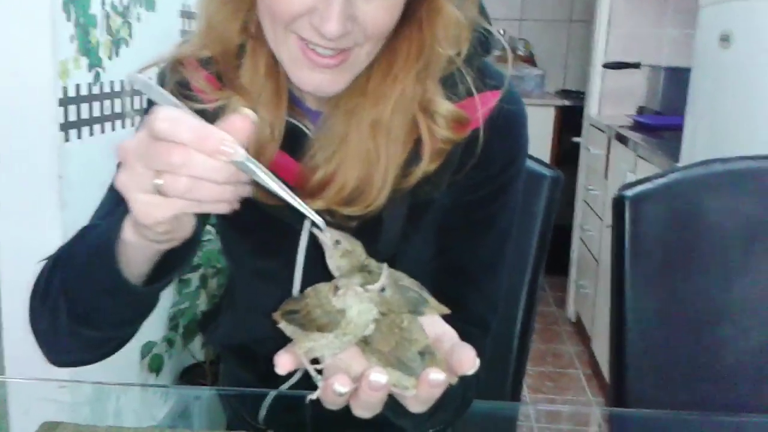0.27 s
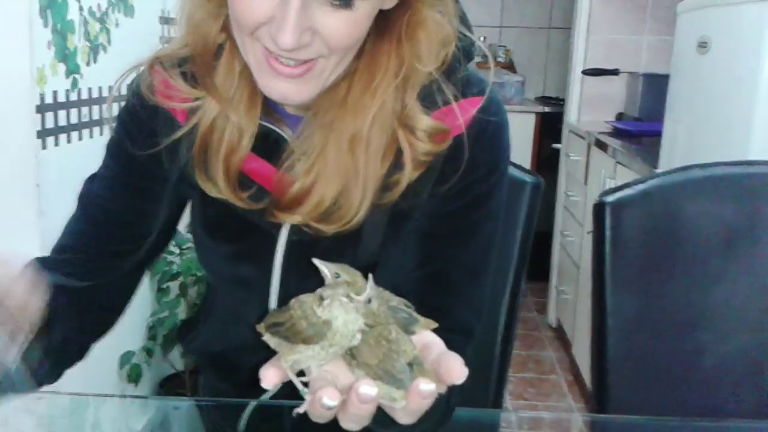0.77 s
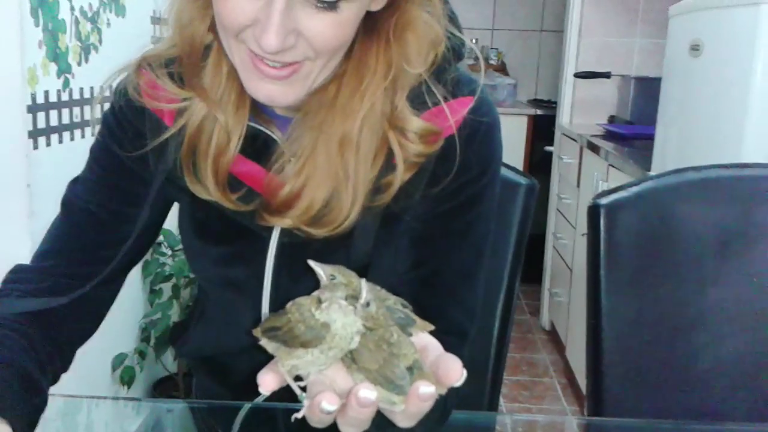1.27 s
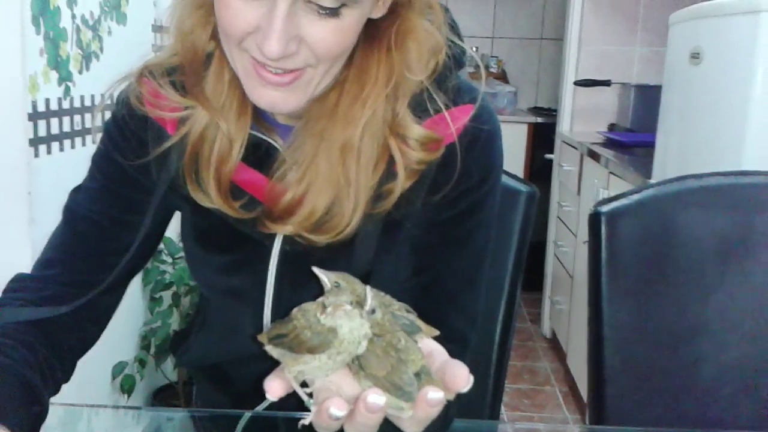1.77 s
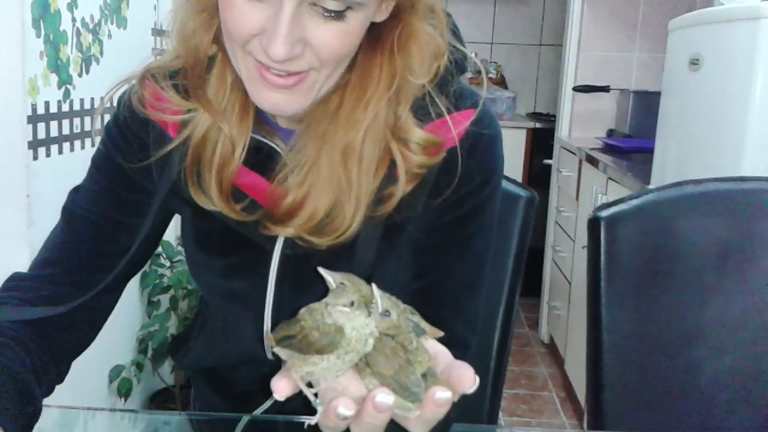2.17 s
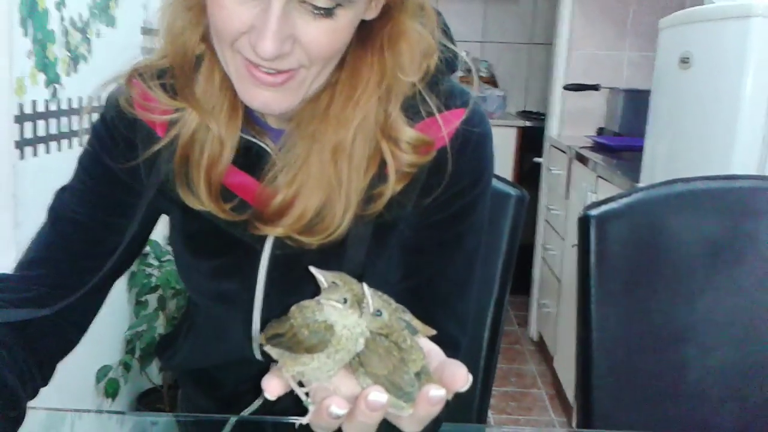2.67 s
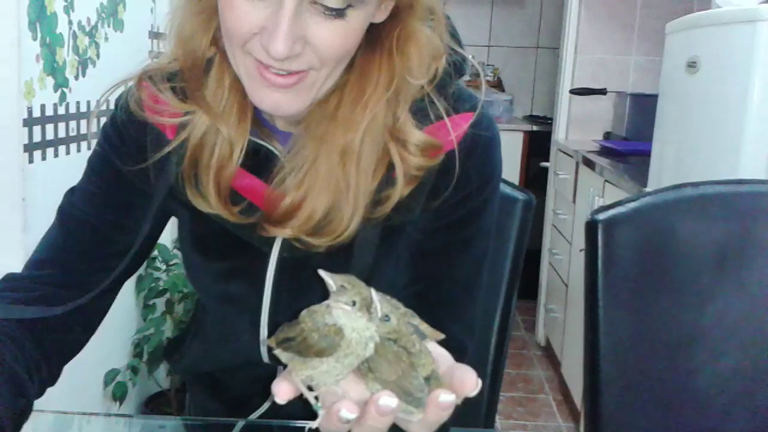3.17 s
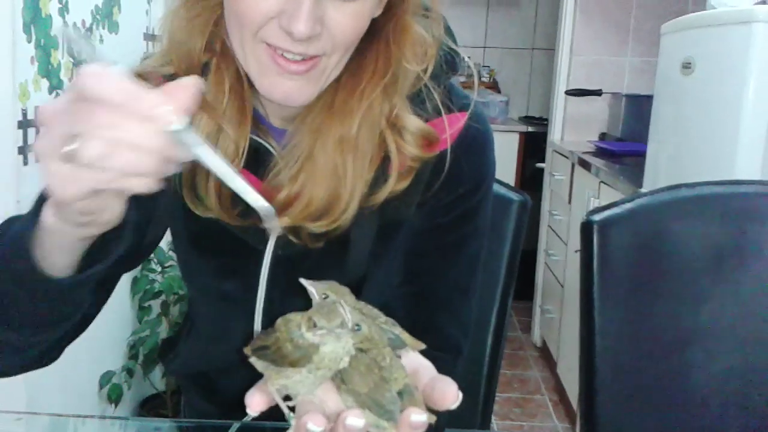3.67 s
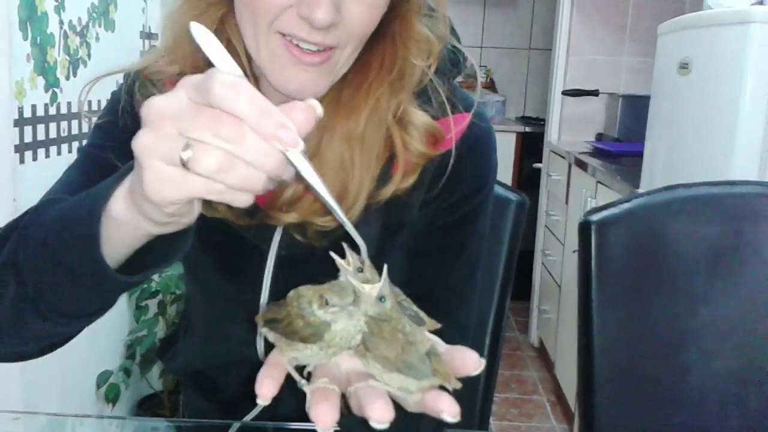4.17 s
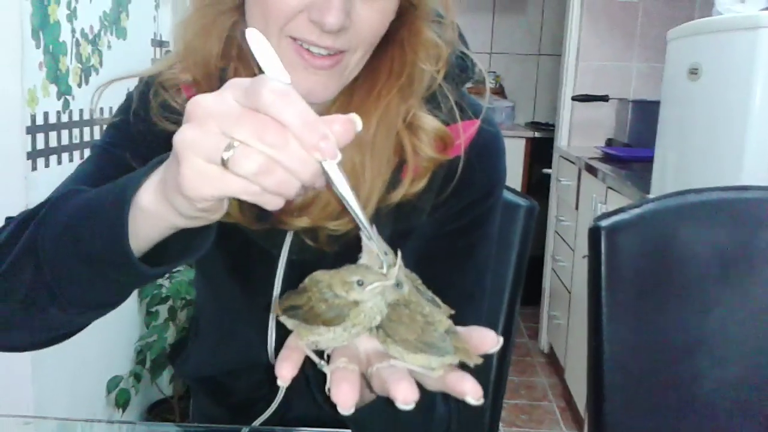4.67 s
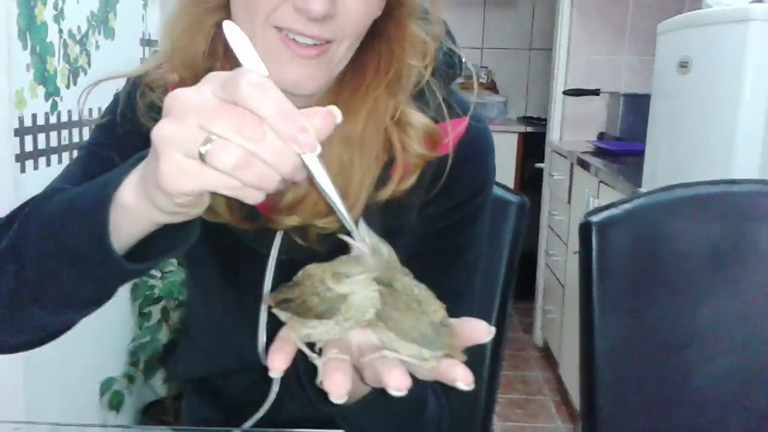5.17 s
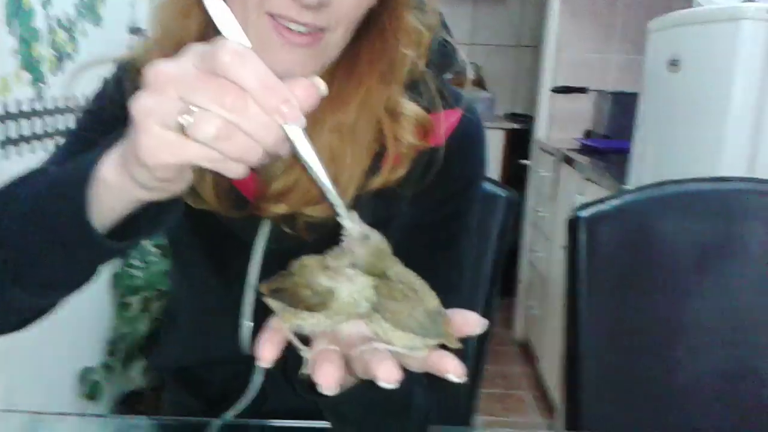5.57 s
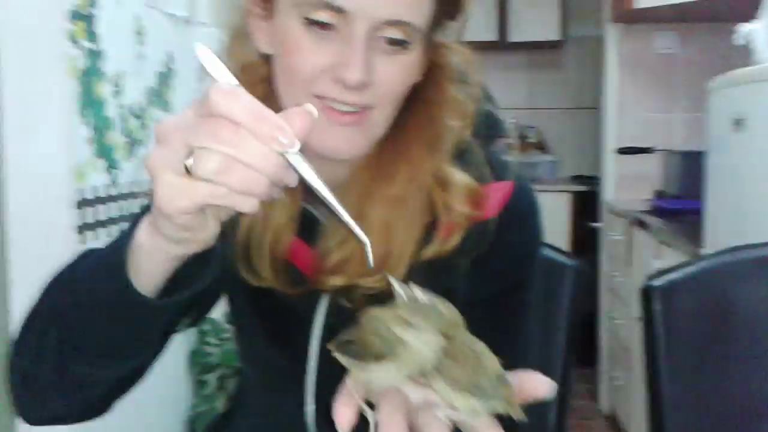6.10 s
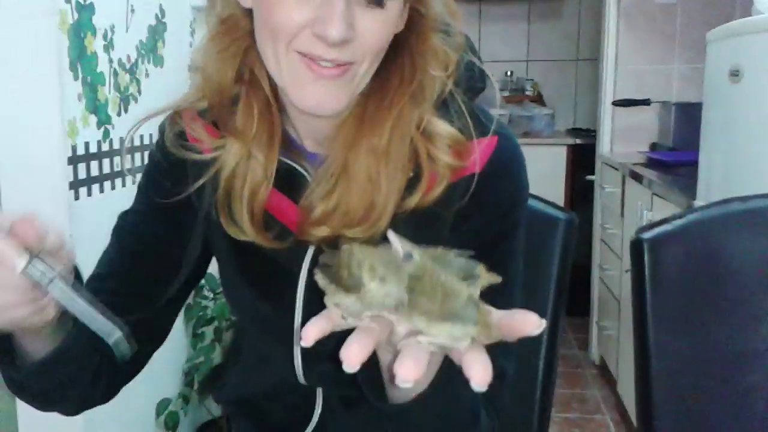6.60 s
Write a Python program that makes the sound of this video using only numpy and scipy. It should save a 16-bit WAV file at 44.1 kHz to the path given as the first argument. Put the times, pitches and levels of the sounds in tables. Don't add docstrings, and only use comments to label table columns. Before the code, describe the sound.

From the start, already under way, a big nestling begs loudly: about seven harsh, buzzy chirps per second, each a steep fall in pitch with a lower chirrup after it, until 0.9 s. A smaller, thinner bird joins at 0.6 s. A sleeve brushes faintly around 0.4 s. Light ticks on a dish come at 1.1 and 1.3 s, a tiny peep at 1.5 s. The small bird gives short bursts at 1.85-2.1 and 2.85-3.1 s; a clearer dish tick follows at 3.3 s. The big one swells from 3.7 s into another strong trill until 4.95 s, with small knocks beneath. Soft peeps at 5.2 s, three small-bird chirps at 5.4-5.7 s with a dull knock, then faint single chirps at 6.1, 6.6 and 6.8 s. Tiled-room reflections trail the calls; suppressed air and fridge hum rise only with them, leaving thin hiss.

```python
import sys
import numpy as np
from scipy import signal
from scipy.fft import rfft, irfft
from scipy.io import wavfile
from scipy.ndimage import uniform_filter1d

SR = 44100
rng = np.random.default_rng(int(sys.argv[2]) if len(sys.argv) > 2 else 0)


def unload_audio(sound):
    columns = np.transpose(np.atleast_2d(sound))
    steps = np.round(np.clip(columns, -1, 1) * 32767)
    wavfile.write(sys.argv[1], SR, steps.astype(np.int16))


def ratio(d):
    e = np.asarray(d, float) / 20
    return 10 ** e


N = 301644
LEAD = 4410


def colour(x, table):
    hz, db = np.transpose(table)
    f = np.maximum(np.arange(len(x) // 2 + 1) * SR / len(x), 1)
    return irfft(rfft(x) * ratio(np.interp(np.log(f), np.log(hz), db)), len(x))


def unit(x):
    return x / np.sqrt(np.mean(x ** 2))


def add(out, x, s):
    i = LEAD + int(s * SR)
    out[i:i + len(x)] += x[:len(out) - i]


def wobble(size, ms):
    k = max(int(ms * SR / 1000), 1)
    return unit(uniform_filter1d(uniform_filter1d(rng.standard_normal(size), k), k))


def bend(ms):
    return np.sqrt(ms ** 2 + 6) - np.sqrt(6)


def bell(x):
    return np.exp(-.5 * x ** 2)


# multiple of the pitch, level in dB.
PARTIALS = [(1, -25.5), (4, -16.5), (5, -28), (6, -27)]
# frequency in Hz, level in dB.
RASP = [(1500, -35.5), (2600, -22), (4000, 2), (8000, -3.5), (10500, -15), (12500, -21), (15000, -19)]


def puff(top_hz, fall, loud_ms, second_db, beak):
    ms = np.arange(-16, 26, 1000 / SR)
    late = ms - loud_ms
    opener = top_hz > 3350
    slope = np.where(ms < 0, 75 if opener else 0.82 * fall, fall)
    knee = np.minimum(ms, max(loud_ms - .9, 0))
    hz = top_hz - slope * bend(knee) - min(fall, 160) * (bend(ms) - bend(knee))
    hz = np.maximum(hz - 20.5 * np.maximum(late, 0) ** 2, 1000)
    phase = 2 * np.pi * np.cumsum(hz * (1 + 0.016 * wobble(len(ms), ms=0.52))) / SR
    flutter = ratio(2.86 * wobble(len(ms), ms=0.86)) * signal.windows.tukey(len(ms), .2)
    flutter = flutter * np.clip((hz - 1000) / 450, 0, 1)

    rise_ms = 2.7 * (160 / fall) ** .45
    push = bell(late / np.where(late < 0, rise_ms, 1.9))
    push = push + 0.36 * bell((late - .6) / (1.7 * rise_ms))
    whistle = 0.15 * opener * bell((ms + 2.0) / 4.5)
    beak_hz, beak_db = np.transpose(beak)

    def partial(k):
        through_beak = ratio(np.interp(np.log(k * hz), np.log(beak_hz), beak_db))
        return flutter * through_beak * (k * hz < 17000) * np.sin(k * phase)

    second = push * partial(2.063)
    third = (push + whistle) * partial(3)
    x = second / abs(second).max() * ratio(min(second_db, 0))
    x = x + third / abs(third).max() * ratio(min(-second_db, 0))
    rasp = ratio(-18.5) * uniform_filter1d(push, size=200) * colour(rng.standard_normal(len(ms)), RASP)
    others = sum(ratio(db) * push * partial(round(k)) for k, db in PARTIALS)
    return np.sqrt(2) * (x + rasp + others)


def add_puff(out, s, top_hz, db, fall, loud_ms, second_db, beak):
    x = ratio(db - 3.5) * puff(top_hz, fall, loud_ms, second_db, beak)
    add(out, x, s - (16 + loud_ms) / 1000)


# frequency in Hz, level in dB.
BEAK = [(1500, -4.5), (2700, -16.5), (3400, -2), (4500, -6), (6100, -1), (7700, -4.5), (9200, -18.5),
        (11800, -19.5), (16000, -17.5)]
# second when loudest, top pitch in Hz, level in dB, 2nd minus 3rd partial in dB.
OPENERS = [(-.0635, 3854, -4, -5), (0.0741, 3846, -8, -0.5), (0.218, 4006, -8.5, 2.5),
           (0.3684, 4026, -7, 0), (0.5198, 3855, -7.5, -5), (.6775, 3800, -6, -4.5),
           (0.8606, 3780, -5.5, -12.5), (3.7047, 3576, -28.5, -2.5), (3.8576, 3830, -12, -11),
           (4.0289, 3790, -4, -11), (4.176, 3990, -7, -2.5), (4.3191, 4103, -8, -2), (4.474, 4360, -7, -3),
           (4.6124, 4127, -4, -8), (4.7565, 3690, -4.5, -8), (6.0875, 3470, -22, 11),
           (6.5617, 3900, -24, 7), (6.805, 3780, -19, 5)]
# second when loudest, top pitch in Hz, level in dB, ms past the top when loudest.
ARCHES = [(-.0435, 2596, -6, 1), (0.0977, 2610, -3, 1.1), (0.2416, 2612, -2.5, 1.07),
          (0.3917, 2670, -2.5, 1.74), (.544, 2704, -3.5, 3), (0.6994, 2600, -2.5, .6),
          (0.8849, 2230, -8, .3), (3.728, 2988, -23, 6.3), (3.8832, 2740, -13.5, 4.7),
          (3.903, 2757, -8, 2.1), (3.931, 2510, -13, .6), (4.0511, 2840, -4.5, 2.6),
          (4.0742, 2458, -6.5, 1), (4.096, 2134, -15.5, 0.48), (4.2002, 2860, -4.5, 3),
          (4.2206, 2260, -4.5, .3), (4.3412, 2733, -3.5, 1.6), (4.364, 2086, -5.5, .3),
          (4.499, 2634, -3, 2.28), (4.6378, 2474, -6, 2.7), (4.781, 2568, -3, 1.57),
          (4.911, 2545, -18.5, 9.3), (4.928, 2294, -9.5, 1.5), (4.9426, 1980, -12, 1.3),
          (4.953, 1688, -21, 1), (5.2687, 2970, -33.5, 4.4), (6.1117, 2457, -16.5, 3.1),
          (6.584, 2650, -20.5, 2.9), (6.61, 2530, -17.5, 0.033), (6.8315, 2244, -17, 0.91)]


def big_nestling():
    out = np.zeros(LEAD + N)
    for s, hz, db, second_db in OPENERS:
        loud_ms = 9 + 3.8 * (hz - 3857) / 1000
        add_puff(out, s, hz, db, 159.7, loud_ms, second_db, BEAK)
    for s, hz, db, loud_ms in ARCHES:
        add_puff(out, s, hz, db, 142.53, loud_ms, -10, BEAK)
    return out


# frequency in Hz, level in dB.
SMALL_BEAK = [(1500, -24), (2700, -9.5), (3800, -7), (5200, -17.5), (6200, 6), (7000, 3), (8200, -12),
              (10000, -15.5), (16000, -49)]
# second when loudest, top pitch in Hz, level in dB, ms past the top when loudest.
PLUNGES = [
    (0.6115, 4485, -10, 7.5),
    (1.848, 4670, -25.5, 6.55),
    (1.945, 4495, -10, 6.1),
    (2.0622, 4407, -5.5, 5.86),
    (2.8507, 4270, -28, 7.2),
    (3.0292, 4300, -8.5, 5.9),
    (5.3675, 4590, -19.5, 6.8),
    (5.4956, 4505, -10, 8.1),
    (5.654, 4537, -9, 6.83),
]
# second when loudest, top pitch in Hz, level in dB, ms past the top when loudest.
SMALL_ARCHES = [(.631, 3050, -16.5, 1.5), (1.8686, 3110, -20.5, 5), (1.891, 3130, -27.5, 2),
                (2.083, 2970, -9.5, 4), (2.1045, 3010, -25, -6), (2.8687, 3020, -30, 4),
                (2.8895, 3040, -15.5, 3.2), (2.916, 3114, -21.5, -0.2), (3.047, 3070, -11, 2.3),
                (3.071, 2980, -12, 3.5), (4.6606, 3145, -9, -1), (5.387, 2910, -25, 2.5),
                (5.5125, 2970, -14.5, 3.5), (5.5366, 3200, -15, 4.5), (5.672, 2913, -17, 1)]


def small_nestling():
    out = np.zeros(LEAD + N)
    for s, hz, db, loud_ms in PLUNGES:
        second_db = -8.5 * (loud_ms - 6.39)
        add_puff(out, s, hz, db, 500.2, loud_ms, second_db, SMALL_BEAK)
    fall = 204.3
    for s, hz, db, loud_ms in SMALL_ARCHES:
        above_hz = hz - fall * max(loud_ms - 1.1, 0) - 2650
        second_db = np.clip(33 * above_hz / 1000, 15, 20)
        add_puff(out, s, hz, db, fall, loud_ms, second_db, SMALL_BEAK)
    return out


# start in seconds, length in seconds, start pitch in Hz, end pitch in Hz, level in dB.
PEEPS = [(1.459, 0.037, 3530, 3530, -62), (1.471, 0.041, 6970, 7140, -54),
         (1.464, 0.061, 5150, 5120, -52.5), (2.393, 0.095, 2970, 3440, -57),
         (2.457, 0.107, 3330, 3400, -64), (3.23, 0.07, 3500, 3500, -47), (3.25, 0.069, 5200, 5170, -53),
         (5.192, 0.076, 4370, 4010, -46), (5.203, 0.04, 5120, 5330, -41), (5.598, 0.046, 3480, 3600, -61.5),
         (5.971, 0.071, 3480, 3570, -61.5), (6.688, 0.032, 3680, 3470, -45.5)]


def peeps():
    out = np.zeros(LEAD + N)
    for s, length, hz0, hz1, db in PEEPS:
        n = int(length * SR)
        drift = wobble(6000, ms=1.5)[:n]
        swell = wobble(6000, ms=3)[:n]
        phase = 2 * np.pi * np.cumsum(np.linspace(hz0, hz1, n) * (1 + 0.016 * drift)) / SR
        octave_db = -5 - 13 * (hz0 / 1000 - 3.5)
        tone = np.sin(phase) + ratio(octave_db) * np.sin(2 * phase)
        add(out, ratio(db - 7.5 + 3.4 * swell) * signal.windows.tukey(n, .7) * tone, s)
    return out


# start in seconds, peak level in dB, ring in Hz, ring time in ms.
TICKS = [(1.1042, -42, 6000, 4.5), (1.1144, -35, 4300, 1.6), (1.1138, -41.5, 2300, 3.7),
         (1.3275, -51, 4440, 2.4), (1.3276, -50, 2280, 2.1), (3.278, -42.5, 5700, 6.0),
         (3.2943, -28.5, 4250, 3.4), (3.2959, -27, 6000, 8.7), (3.3066, -57, 6000, 5.1),
         (4.584, -47, 1500, 0.68), (5.6261, -45, 2450, 1.1)]
# start in seconds, crack level in dB, level of the table's thud in dB.
KNOCKS = [
    (1.1144, -45.5, -57),
    (1.3272, -47, -63),
    (3.2938, -39.5, -43.5),
    (4.129, -58, -49),
    (4.584, -42.5, -41.5),
    (5.627, -53, -40.5),
]


def tweezers():
    out = np.zeros(LEAD + N)
    t = np.arange(2000) / SR
    for s, db, hz, ms in TICKS:
        ring = colour(rng.standard_normal(len(t)), [(0.58 * hz, -26), (hz, 0), (1.4 * hz, -26)])
        add(out, ratio(db) * unit(ring) * np.exp(-t * 1000 / ms), s)
    crack = colour(np.exp(-t / .00006), [(300, -8.0), (1500, 6.5), (5000, 28), (9000, 12.0)])
    thud = np.sin(2 * np.pi * 420 * t) * np.exp(-t / 0.0025)
    for s, crack_db, thud_db in KNOCKS:
        add(out, ratio(crack_db) * crack + ratio(thud_db) * thud, s)
    return out


# middle in seconds, length in seconds, level in dB.
SLEEVE = [
    (0.374, .4, -52.5),
    (2.52, .2, -68),
    (4.134, .06, -62.5),
    (6.72, 0.27, -63.5),
]


def sleeve():
    t = np.arange(N) / SR
    cloth = [(60, -27), (130, -2), (350, -3), (900, -10.5), (2000, -21.5)]
    rub = unit(colour(rng.standard_normal(N), cloth)) * ratio(2.5 * wobble(N, ms=15))
    return rub * sum(ratio(db) * bell(3 * (t - s) / length) for s, length, db in SLEEVE)


# delay in ms, level in dB.
ECHOES = [(1.6, -21), (3.9, -14.5), (6.5, -14), (9.5, -16), (13, -15.5)]
# frequency in Hz, time to die by 60 dB in seconds, level in dB.
KITCHEN = [(400, 0.67, -16), (1500, 0.94, -11), (3500, 0.25, -0.5), (6000, 0.32, -9.5), (7900, 0.33, -10),
           (12300, 0.38, -8)]


def kitchen(near, far):
    t = np.arange(SR // 2) / SR
    response = np.zeros(len(t))
    for ms, db in ECHOES:
        response[int(ms * SR / 1000)] = ratio(db)
    noise = rng.standard_normal(len(t)) * ratio(4.8 * wobble(len(t), ms=0.51) * np.exp(-t / 0.085))
    log_hz = np.log(np.arange(len(t) // 2 + 1) * SR / len(t) + 1)
    centres = np.log(np.array(KITCHEN)[:, 0])
    for k, (hz, t60, db) in enumerate(KITCHEN):
        share = np.interp(log_hz, centres, np.eye(len(KITCHEN))[k])
        band = irfft(rfft(noise) * share, len(t))
        decay = np.exp(-np.log(1000) * t / t60) * (1 - np.exp(-t / 0.0066))
        response += ratio(db - 27.0) * band * decay
    wet = signal.fftconvolve(near + ratio(3.5) * far, response)
    return (near + far)[LEAD:] + wet[LEAD:LEAD + N]


def suppressor(front):
    shut_db, opens_above_db, open_share = -77.5, -69, 0.31
    memory_s, ahead_s = 0.041, 0.01
    keep = np.exp(-1 / (memory_s * SR))
    power = uniform_filter1d(front ** 2, int(2 * ahead_s * SR))
    power = signal.lfilter([1 - keep], [1, -keep], power, zi=[power[0]])[0]
    return shut_db + open_share * 10 * np.log10(1 + abs(power) / ratio(2 * opens_above_db))


# frequency in Hz, level in dB per Hz.
AIR = [(25, -6), (100, -5.5), (130, -1), (400, -1.5), (900, -7), (1300, -4), (1800, -2), (2300, -7),
       (6000, -8), (15500, -26)]
# frequency in Hz, width in Hz, level in dB.
FRIDGE = [(248.7, 6.3, -13), (643, 4.9, -15.5), (1818, 690, -8.5), (3480, 40, -23.5), (4900, 50, -16.5)]


def background(through_db):
    out = ratio(0.4 * wobble(N, ms=87)) * unit(colour(rng.standard_normal(N), AIR))
    for hz, width, db in FRIDGE:
        line = colour(rng.standard_normal(N), [(hz - width, -40), (hz, 0), (hz + width, -40)])
        out += ratio(db + 2.5 * wobble(N, ms=150)) * unit(line)
    hiss = colour(rng.standard_normal(N), [(1200, -44), (3000, -13.5), (7000, 1.5), (15000, -8.5)])
    return ratio(8.0 + through_db) * out + ratio(-78.5) * unit(hiss)


def scene():
    front = kitchen(big_nestling() + small_nestling(), peeps() + tweezers())
    return (front + background(suppressor(front)) + sleeve())[None]


def top_cut(x):
    return signal.sosfilt(signal.butter(12, 15950, fs=SR, output="sos"), x)


def record(dry):
    octave = signal.sosfilt(signal.butter(4, 9000, "high", fs=SR, output="sos"), dry ** 2)
    x = dry + 0.042 * octave
    x = np.tanh(0.91 * x) / 0.91
    x = signal.sosfilt(signal.ellip(10, .2, 80, 15200, fs=SR, output="sos"), x)
    return top_cut(x)


dry = scene()
out = record(dry)
unload_audio(out)
```